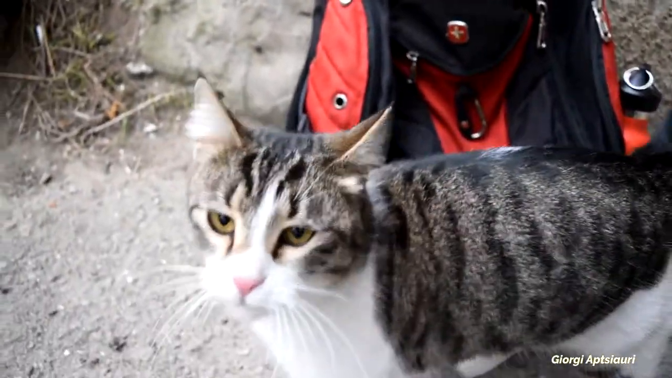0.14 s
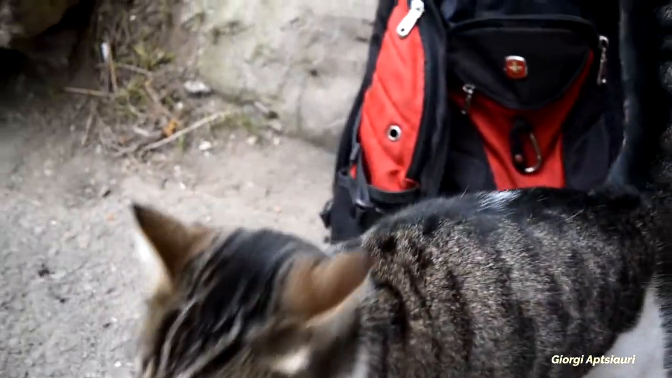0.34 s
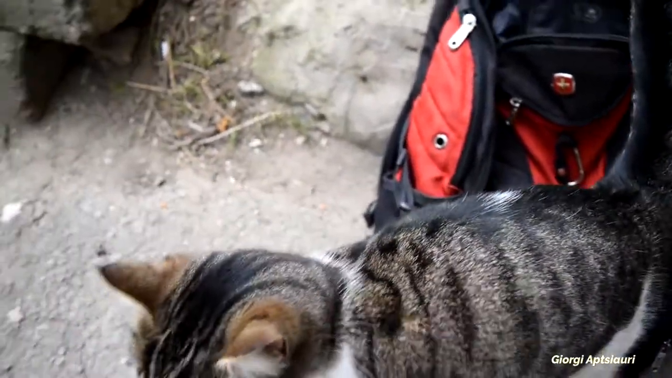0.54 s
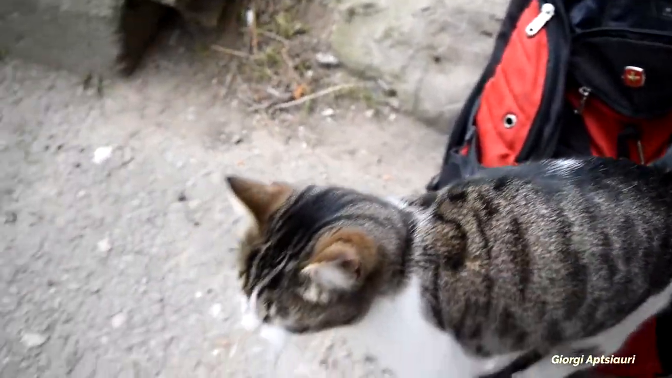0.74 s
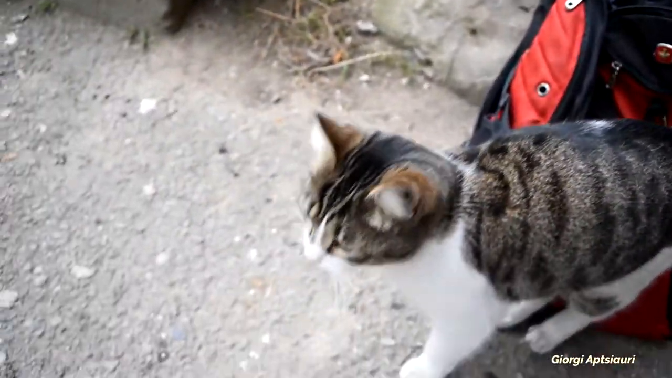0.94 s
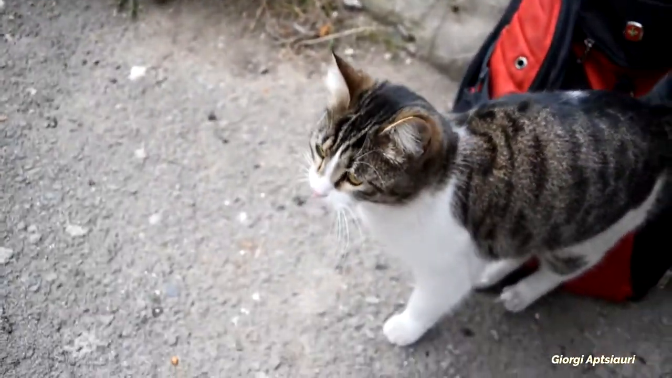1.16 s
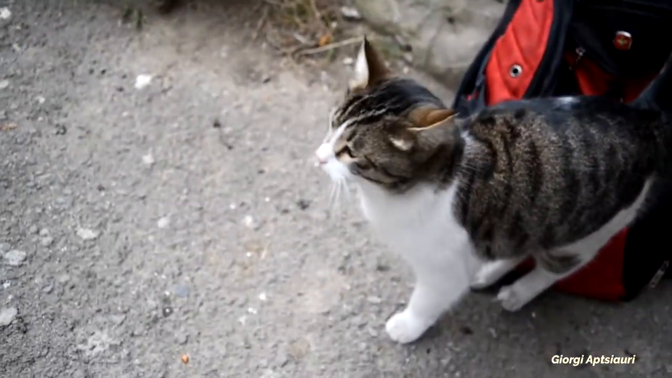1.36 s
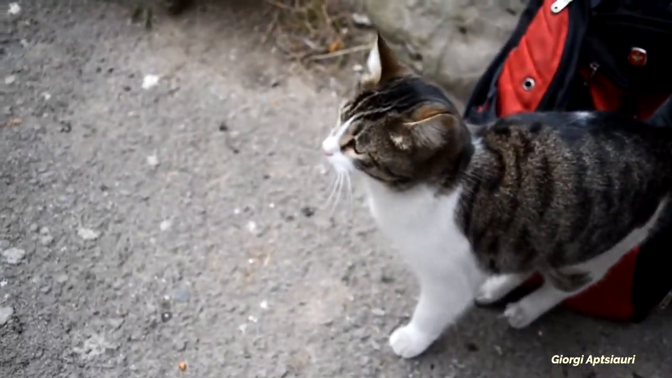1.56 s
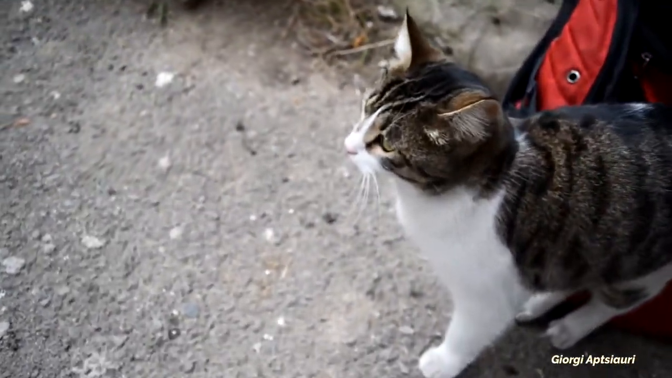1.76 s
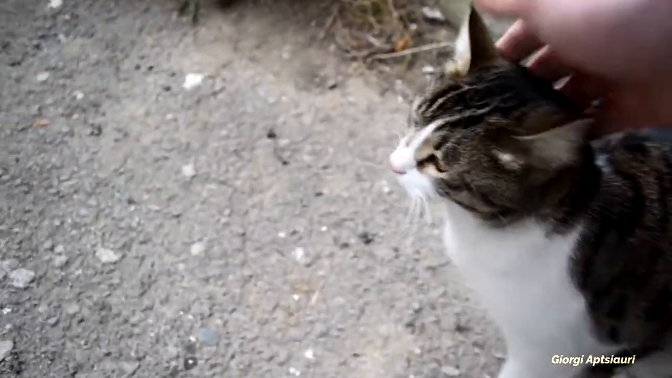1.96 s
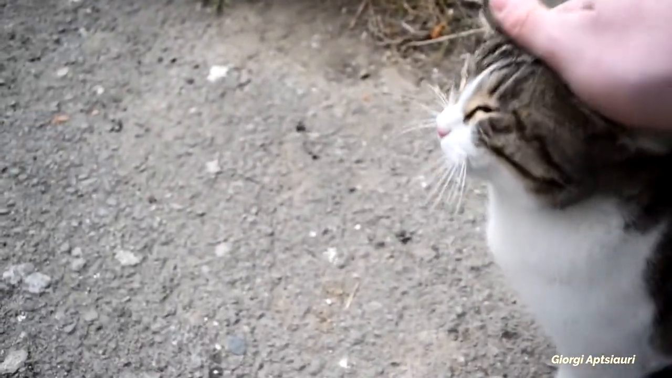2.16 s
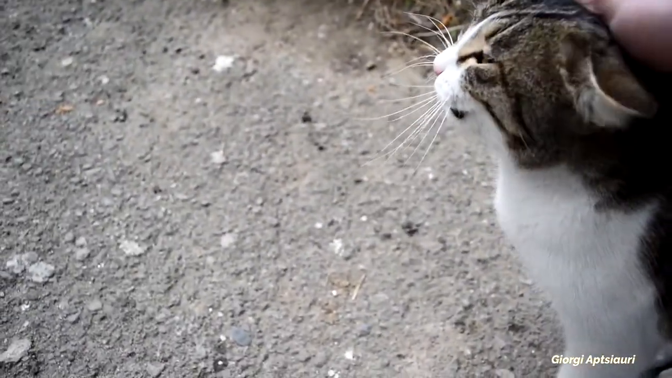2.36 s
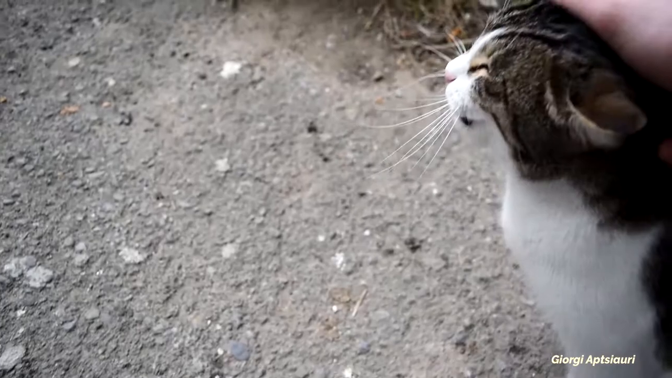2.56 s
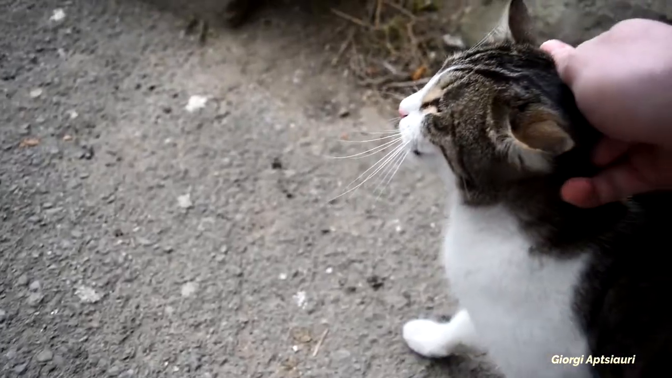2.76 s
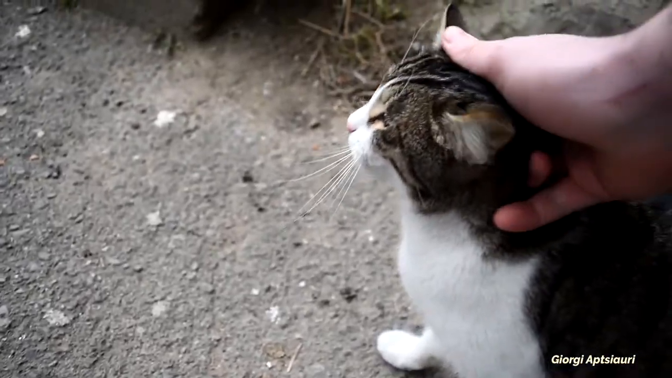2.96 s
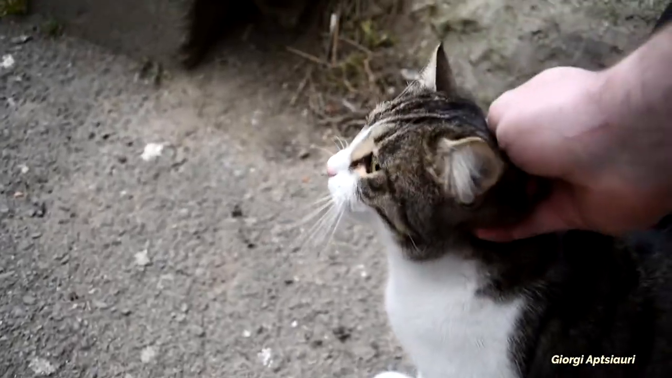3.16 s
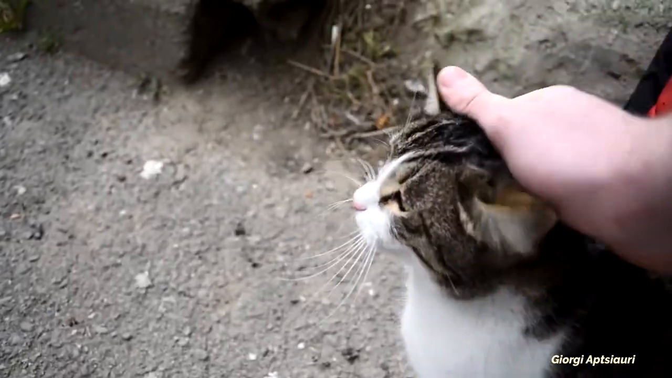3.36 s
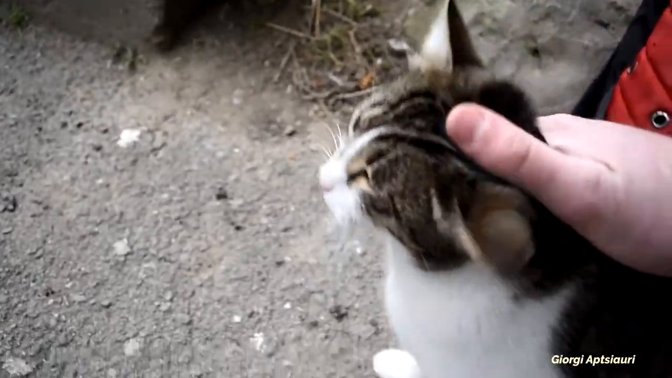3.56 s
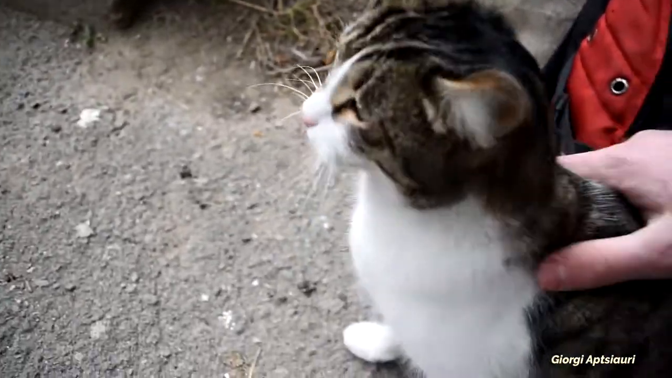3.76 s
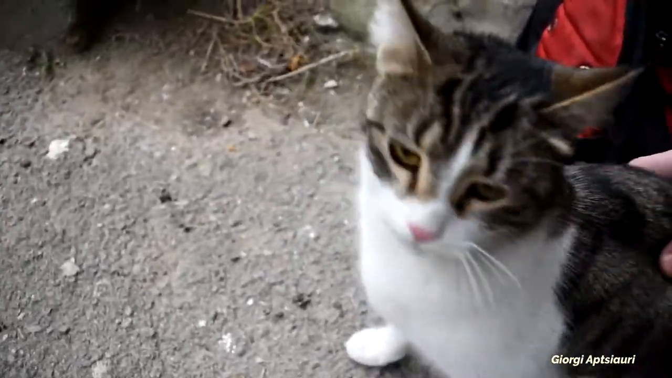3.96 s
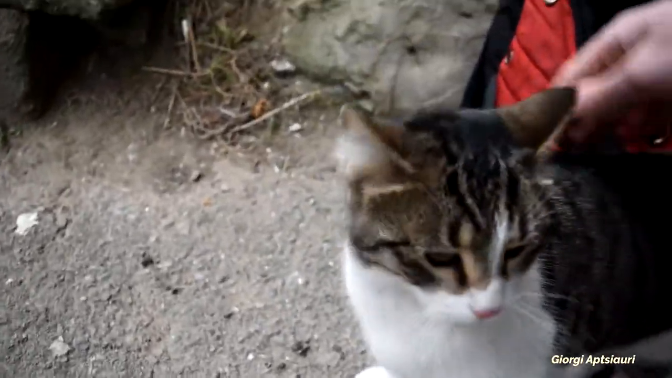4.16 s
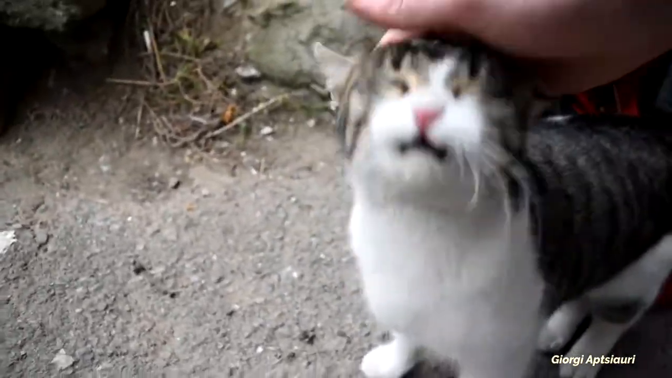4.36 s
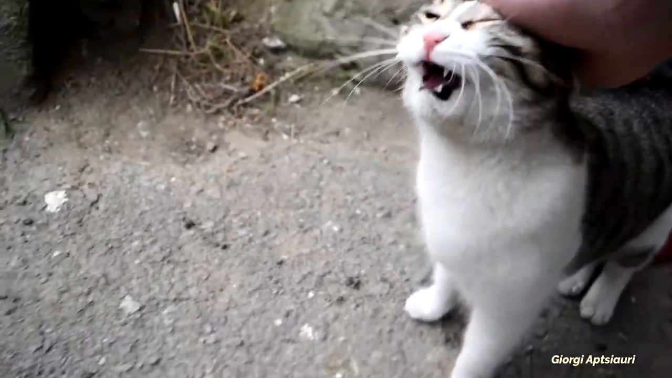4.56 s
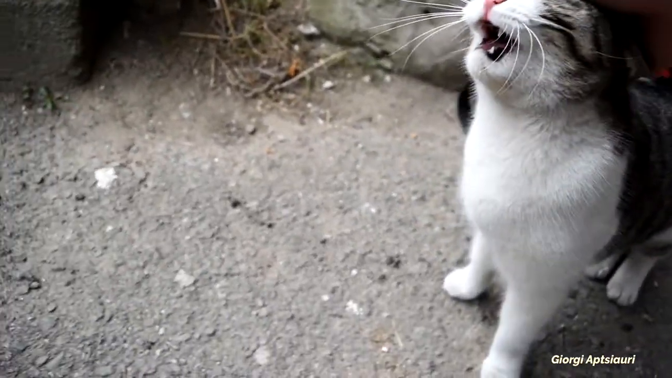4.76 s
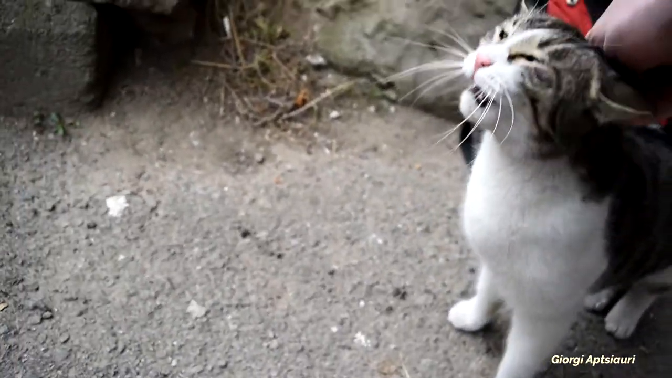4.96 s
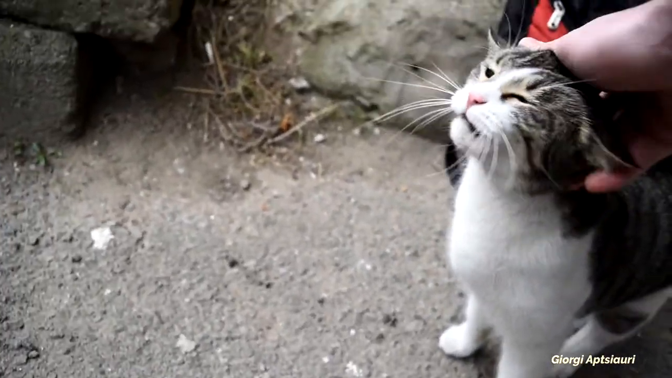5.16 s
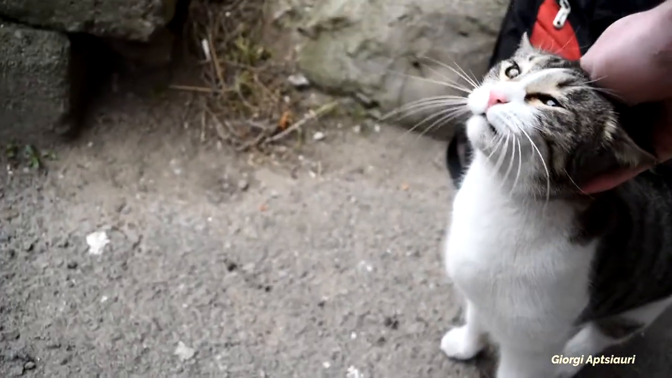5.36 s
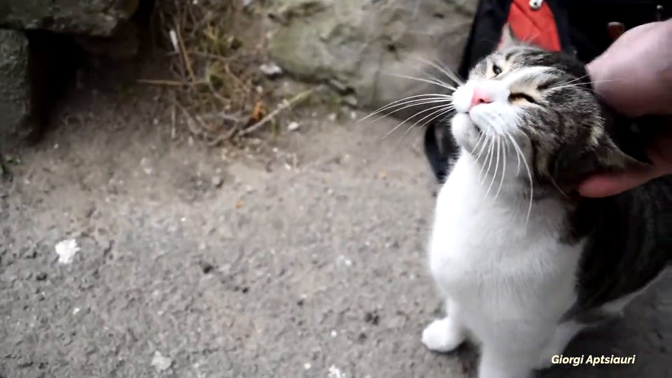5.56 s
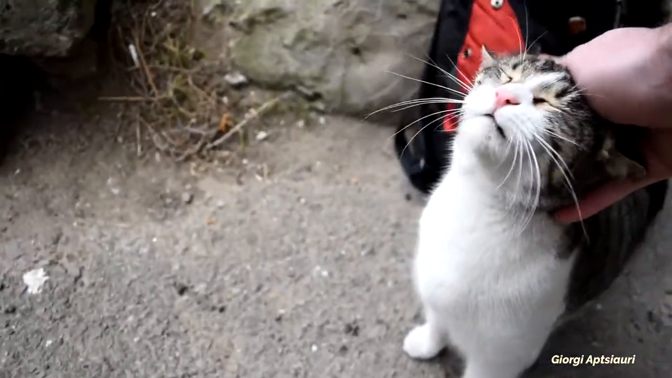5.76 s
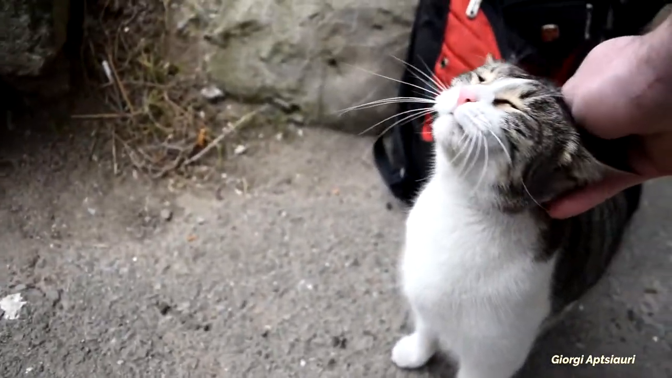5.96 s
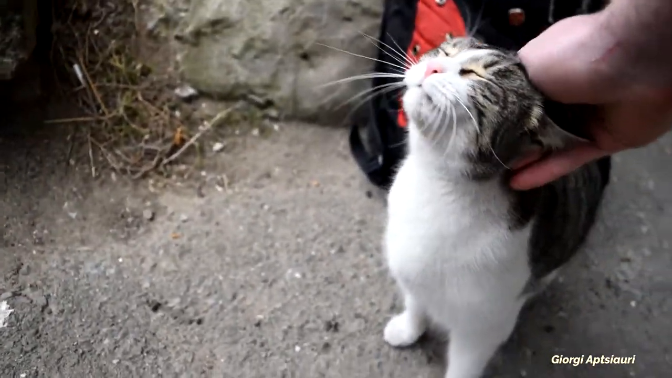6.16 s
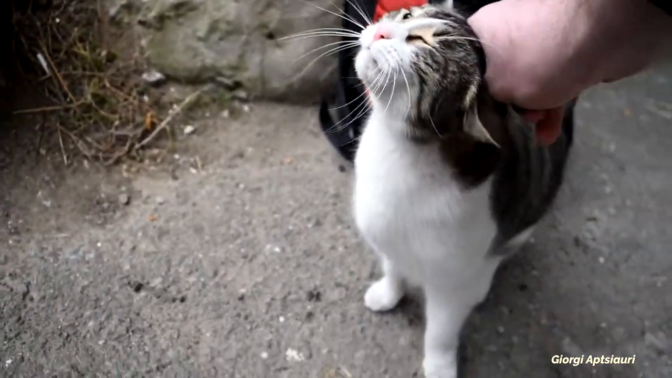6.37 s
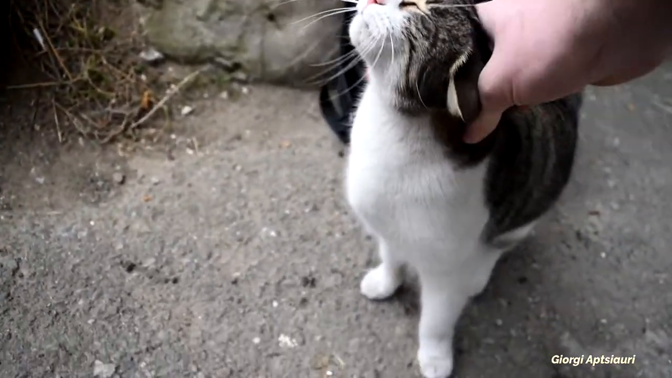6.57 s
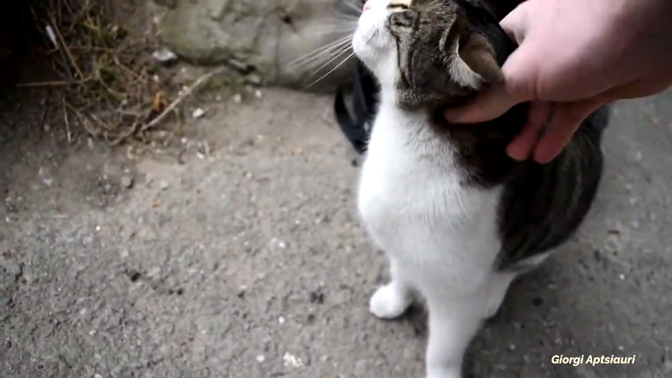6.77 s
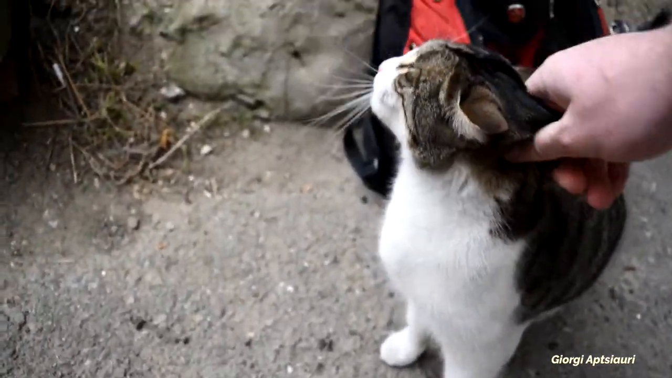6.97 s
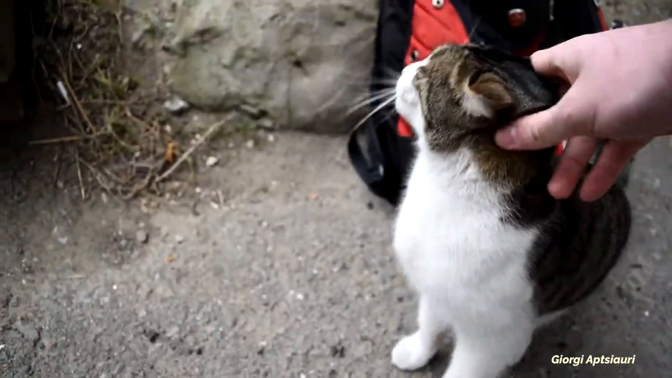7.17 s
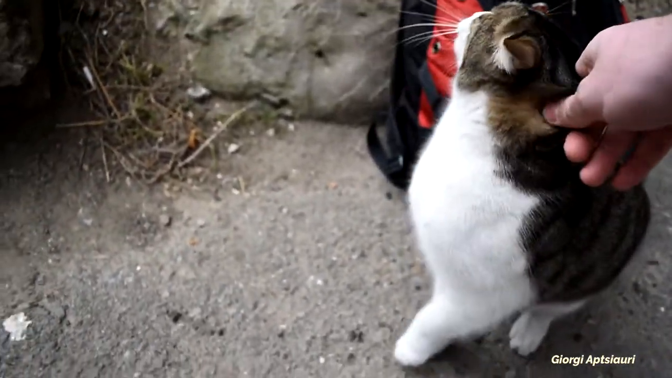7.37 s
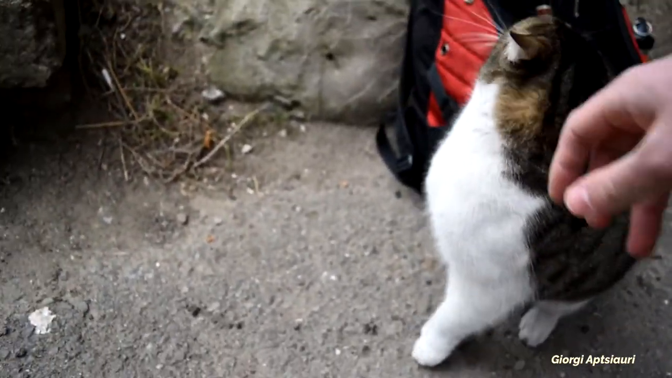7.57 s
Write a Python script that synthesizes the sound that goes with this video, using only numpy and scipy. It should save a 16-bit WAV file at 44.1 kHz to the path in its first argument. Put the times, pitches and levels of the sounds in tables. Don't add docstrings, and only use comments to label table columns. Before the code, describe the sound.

Three hoarse, trilling cat meows on gravelly ground, between clicks, shoe grit and soft fur stroking, with faint traffic and microphone hiss behind.

```python
import sys
import numpy as np
from scipy import signal
from scipy.fft import rfft, irfft, next_fast_len
from scipy.io import wavfile
from scipy.ndimage import map_coordinates

SR = 44100
rng = np.random.default_rng(int(sys.argv[2]) if len(sys.argv) > 2 else 0)


def master_out(mix):
    frames = np.transpose(np.atleast_2d(mix))
    ceiling = np.clip(frames, -1, 1)
    pcm = np.round(ceiling * 32767).astype(np.int16)
    wavfile.write(sys.argv[1], SR, pcm)


def nominal_scale(level):
    x = np.asarray(level, float) / 20
    return 10 ** x


N = 335601

# frequency_hz, level_db (per Hz)
TOWN_SPECTRUM = [(20, -36), (40, -4.5), (65, -4), (130, -5), (250, -8), (400, -11), (1300, -11),
                 (1800, -14), (2500, -19), (3500, -33), (5200, -38), (8000, -31), (12500, -38),
                 (15800, -44)]
# frequency_hz, likeness (-1 to 1)
TOWN_LIKENESS = [(60, .9993), (150, .999), (380, .984), (950, 0.98), (2380, 0.975), (5980, 0.52),
                 (15000, -0.55)]
# frequency_hz, level_db (per Hz)
JACKET_SPECTRUM = [(2000, -1), (2900, 2), (3800, 1.5), (5000, -2), (6500, -3.5), (9000, -5.5),
                   (12000, -14.5), (15600, -16.5)]
# start_s, strongest_s, end_s, level_db
JACKET_MOVES = [(.45, .71, 0.76, -74), (1.05, 1.13, 1.09, -70), (1.4, 1.48, 1.7, -75), (1.5, 2.7, 4, -75),
                (3.6, 3.9, 4.4, -81), (3.44, 3.53, 3.62, -70.5), (4.1, 4.55, 5.1, -72.5),
                (5.2, 5.44, 5.62, -69), (5.65, 5.9, 6.4, -81.5), (6.07, 6.13, 6.5, -77.5),
                (7.4, 7.62, 8.6, -78)]
# frequency_hz, level_db (per Hz)
FUR_SPECTRUM = [(3820, -47), (6500, -1), (7090, -2.5), (7810, 6.5), (8190, 6.5), (10400, 0.5),
                (12600, -11.5), (14000, -35)]
# start_s, strongest_s, end_s, level_db
FUR_STROKES = [(-.02, 0, 0.0035, -57), (.57, .59, 0.62, -66), (.63, .72, 1, -71), (1.08, 1.125, 1.17, -70),
               (1.42, 1.5, 1.24, -77), (2.28, 2.5, 2.85, -67.5), (2.6, 3.05, 3.26, -69),
               (3.47, 3.53, 4.8, -81), (4.12, 4.3, 5.5, -75.5), (4.35, 4.6, 5.5, -75),
               (5.36, 5.5, 5.56, -72), (5.81, 5.9, 5.9, -70), (6.08, 6.15, 6.4, -68),
               (6.22, 6.36, 5.5, -72), (7.45, 7.62, 7.7, -86)]
# time_s, peak_db, ring_hz
KNOCKS = [(.206, -47, 796), (.426, -38, 1450), (.449, -36, 900), (.587, -35.5, 604), (1.366, -37, 1070),
          (1.393, -38.5, 1480), (1.421, -40.5, 1100), (1.5, -33.5, 1040), (1.5262, -22, 2480),
          (1.527, -37.5, 614), (1.533, -32.5, 804), (3.517, -45, 3000), (4.0722, -47, 3030),
          (5.126, -46, 2400), (5.158, -44, 1600), (3.935, -42, 820), (4.072, -43, 1760),
          (5.379, -32.5, 670), (5.395, -40, 890), (6.215, -41.5, 800), (7.599, -30.5, 2300)]

# time_s, pitch_hz
PITCH = [
    [(.27, 552.3), (.365, 632), (.42, 808), (.445, 777), (.49, 836), (.54, 787), (.595, 875), (.66, 795),
     (.82, 753)],
    [(2.2, 639), (2.25, 614), (2.315, 753), (2.345, 769), (2.4, 883), (2.48, 892), (2.525, 798),
     (2.62, 815), (2.74, 803)],
    [(4.47, 488.6), (4.575, 736), (4.64, 834), (4.692, 893), (4.712, 844), (4.765, 837), (4.84, 768),
     (4.93, 780), (5.12, 762)],
]
# time_s, effort_db, opening (0-1)
EFFORT = [
    [(.232, -61, 0.14), (.256, -45.5, 0.12), (.283, -48.5, 0.5), (.33, -39, 0.8), (.375, -49, 0.72),
     (.415, -47.5, 0.89), (.5, -52.5, 0.75), (.6, -45.5, 0.68), (.8, -55.5, 0.8)],
    [(2.16, -58, 0.16), (2.215, -48.5, 0.06), (2.255, -46.5, 0.66), (2.325, -39, 0.83), (2.4, -43.5, 0.5),
     (2.495, -48, 0.5), (2.525, -44, 0.9), (2.76, -48, 0.78), (2.81, -71, 1)],
    [(4.29, -55, 0.13), (4.441, -54.5, 0.05), (4.451, -48, 0.95), (4.52, -36.5, 0.87), (4.57, -39.5, 1),
     (4.66, -37.5, 0.79), (4.8, -39.5, 0.89), (4.87, -44, 0.78), (5.128, -56.5, 0.86)],
]
# palate_db (beside effort), palate_base_hz, palate_closes_s,
# mouth_shift_before_hz, mouth_shift_after_hz, palate_flutter_db
THROAT = [
    (-20, 1850, 0.6, 40, 0, 3.5),
    (-23, 1480, 2.5, -45, -57, 4),
    (-13, 3050, 4.95, 130, 263, 1),
]
# scatter_before (share of pitch), lock_s, slip_s, scatter_after (share of pitch)
HOARSE = [
    (.015, .31, .68, .018),
    (.04, 2.228, 2.745, .028),
    (.06, 4.465, 5.035, .035),
]
# time_s, pitch_drop (share), choke_db (just before)
OPENING_FLAPS = [(0.235, 0.045, 0), (.27, 0.14, -19), (0.2928, .1, -9), (0.3232, 0.18, -5),
                 (2.18, 0.095, -9), (2.22, 0.11, -7), (2.245, 0.12, -5), (2.42, 0.012, -10),
                 (4.464, 0.046, -10), (4.494, 0.041, -4), (4.617, 0.028, 2), (4.652, 0.031, -1)]
# (each time_s, pitch_drop (share), choke_db)
FLAP_BOUTS = [
    (.016, 8, 2, .3, [(4.311, -.12, -10), (4.334, -.12, -14), (4.353, -.13, -14), (4.373, -.02, -14), (4.395, -.12, -14), (4.418, -.02, -16), (4.442, .02, -14)]),
    (.011, 5, 2, .5, [(2.546, 0.04, -8), (2.58, 0.05, -14), (2.61, 0.06, -12), (2.641, .17, -3), (2.677, .16, -3), (2.71, .17, -3), (2.739, .2, -8), (2.77, .11, -3)]),
    (.011, 55, 4, .26, [(4.931, 0.012, -17), (4.956, 0.12, -8), (4.986, .18, -12), (5.014, 0.18, -8), (5.031, .16, -3), (5.046, 0.19, -3), (5.063, 0.19, -3), (5.083, .18, -9), (5.102, .16, -5)]),
]
# opening (0-1), nose_db, jaw_db, mouth_db
MOUTH_OPENING = [(0, 2, -11.5, -39), (.3, -15.5, -1, -7), (.7, -26, 0, -0.5), (1, -32, -15.5, 3.5)]
# frequency_hz, level_db
NOSE = [(300, -12), (450, 6), (950, 4), (1100, -40)]
# frequency_hz, level_db
JAW = [(800, -22.5), (1000, 4), (1150, 3), (1780, 1), (1900, -4.5), (2300, -68)]
# frequency_hz, level_db
MOUTH_SKIRT = [(1200, -33), (2000, -11.5), (2800, -24), (3300, -25), (3800, -29), (4500, -73)]
# overtone (multiple of pitch), level_db
PALATE = [(3, -27), (4, -6.5), (5, -16), (6, -37), (7, -13), (8, -8), (9, -0.5), (10, -9.5), (11, -17),
          (12, -31), (14, -40)]

# time_s, peak_db, ring_hz
TICKS = [(0.4246, -55, 2300), (0.5858, -43, 3590), (0.5862, -34.5, 7540), (1.5262, -26, 10980),
         (0.6044, -55, 3727), (0.8717, -44.5, 3400), (1.4316, -35.5, 5530), (1.4464, -40, 5720),
         (1.4556, -46, 5870), (1.4726, -37, 5600), (1.4854, -35, 5000), (1.4475, -46, 11000),
         (1.5222, -30, 6000), (.443, -48, 6500), (1.119, -42, 3600), (1.501, -29.5, 4300),
         (1.5259, -19, 5630), (1.5316, -26.5, 6000), (3.5169, -41, 8300), (3.7594, -49, 9600),
         (3.9103, -49, 9800), (4.0223, -48, 7800), (4.4314, -32, 4800), (5.0892, -34.5, 3900),
         (5.1103, -47, 3500), (6.4504, -62, 4040), (7.3746, -47, 3310), (7.434, -48, 3200),
         (7.554, -44.5, 3390), (7.5988, -45, 3310), (7.6054, -44, 3330)]
# time_s, peak_db, ring_hz
CRUNCHES = [(.449, -40, 600), (.611, -44, 850), (.63, -46, 1650), (.672, -36, 820), (.684, -35, 1550),
            (.695, -40, 980), (.705, -44, 1500), (.718, -38, 1800), (.732, -45, 560), (.742, -43, 1400),
            (.76, -46, 1600), (.78, -41, 1700), (.803, -37, 1700), (.812, -54, 2700), (.829, -37, 1760),
            (.835, -37, 900), (.838, -40, 1750), (.845, -43.5, 285), (.861, -41, 1600), (1.011, -45, 930),
            (1.3928, -35.5, 1470), (5.086, -35, 710), (5.11, -38, 775), (5.064, -40, 752)]
# frequency_hz, level_db (per Hz)
GRIT_SPECTRUM = [(150, -16), (380, -25), (520, 0.5), (700, -3), (1270, -8.5), (1700, 0), (2400, -11.5),
                 (2880, -15), (3700, -12), (4400, -30), (4950, -17), (5600, -27), (7500, -20), (12000, -50)]
# start_s, strongest_s, end_s, level_db
SCUFFS = [
    (.48, .56, 0.68, -56.5),
    (.6, .71, 0.79, -52.5),
    (.62, .76, 0.98, -51.5),
    (1.84, 1.95, 2.11, -60.5),
    (3.35, 3.95, 4.02, -65.5),
    (4.3, 4.44, 4.55, -60.5),
    (5.27, 5.4, 5.68, -61),
    (6.1, 6.24, 5.4, -69),
]
# time_s, length_s, level_db, ring_hz
CRINKLES = [(1.041, 0.027, -60, 5000), (1.122, 0.024, -59, 5770), (1.262, 0.06, -65.5, 5340),
            (1.477, 0.023, -47, 4900), (1.509, 0.018, -53, 5000), (1.5263, 0.0028, -30.5, 5800),
            (1.474, .008, -58, 9000), (1.528, .003, -38, 5500), (5.034, 0.0088, -53, 7010),
            (5.066, 0.012, -51, 6760), (2.078, 0.089, -62, 5040), (3.521, 0.026, -65, 7950),
            (6.156, 0.043, -64, 5230)]
# time_s, level_db
WHINE = [
    (3.47, -84),
    (3.55, -74),
    (3.85, -75),
    (4.0, -84),
]
# start_s, strongest_s, end_s, level_db
LORRY_SWELLS = [
    (4.75, 4.9, 5.05, -70),
    (5.95, 6.15, 6.4, -61),
    (6.5, 6.78, 7, -62),
]
# frequency_hz, level_db (per Hz)
LORRY_SPECTRUM = [(45, -40), (58, 5), (64, 5), (72, -3), (90, -46.5)]
# time_s, peak_db, pitch_hz
BIRD_PIPS = [
    (6.282, -52, 2260),
    (6.4527, -48.5, 2240),
    (6.652, -51, 2240),
]
# time_s, level_db
SLEEVE_DRAG = [
    (6.75, -68),
    (6.95, -62.5),
    (7.1, -54),
    (7.2, -48),
    (7.27, -43),
    (7.31, -46),
    (7.345, -56),
    (7.38, -70),
]
# frequency_hz, level_db (per Hz)
SLEEVE_SPECTRUM = [(60, -37), (100, -5), (250, -6), (530, -7), (1730, -8.5), (2100, -13), (2700, -5.5),
                   (3480, -14), (4120, -9.5), (9200, -18), (10600, -25), (12000, -19), (13600, -35),
                   (15700, -33)]
# centre_hz, width_hz, level_db
CASE = [(4160, 130, -3), (5740, 170, -4), (6970, 160, -8), (15200, 500, -4)]


def unit(x):
    return x / np.sqrt(np.mean(x ** 2) + 1e-20)


def along(points, hz):
    f, v = np.transpose(points)
    return np.interp(np.log(hz + 1), np.log(f + 1), v)


def curves(rows):
    s, *cols = np.transpose(rows)
    return [np.interp(np.arange(N) / SR, s, c) for c in cols]


def step(t, s, width):
    return .5 + .5 * np.tanh((t - s) / width)


def fade(rows, s):
    t = np.arange(N) / SR
    return np.clip(np.minimum(t - rows[0][0], rows[-1][0] - t) / s, 0, 1)


def swells(moves, pointed):
    t, strength = np.arange(N) / SR, np.zeros(N)
    for start, top, end, db in moves:
        u = np.interp(t, [start, top, end], [0, 1, 0])
        strength += nominal_scale(db) * np.abs(np.sin(np.pi / 2 * u)) ** pointed
    return strength


def wobble(rate, size=N):
    points = rng.standard_normal(int(size * rate / SR) + 4)
    return map_coordinates(points, [np.arange(size) * rate / SR])


def coloured(x, gain):
    m = next_fast_len(N)
    return irfft(rfft(x, m) * gain(np.fft.rfftfreq(m, 1 / SR)), m)[..., :N]


def rush(spectrum, alike, grain_db, grain_rate):
    def middle_and_side_gain(hz):
        turn = np.arccos(np.clip(along(alike, hz), -1, 1)) / 2
        return nominal_scale(along(spectrum, hz)) * [np.cos(turn), np.sin(turn)]

    pair = rng.standard_normal((2, N)) * nominal_scale(grain_db * wobble(grain_rate))
    mid, side = coloured(pair, middle_and_side_gain)
    return unit(np.array([mid + side, mid - side]))


def ring(x, hz, spread):
    band = [hz / spread, min(hz * spread, SR / 2.2)]
    return signal.lfilter(*signal.butter(2, band, "band", fs=SR), x)


def contacts(events, t60, spread, side):
    out, t = np.zeros((2, N + SR)), np.arange(SR // 40) / SR
    for s, db, hz in events:
        crack = rng.standard_normal((2, len(t))) * nominal_scale(-60 * t / t60)
        mid, apart = ring(crack, hz, spread)
        hit = np.array([np.roll(mid, 1) + side * apart, mid - side * apart])
        out[:, round(s * SR):][:, :len(t)] += nominal_scale(db) * hit / np.abs(mid).max()
    return out[:, :N]


def town():
    level_db = -55.4 + .3 * wobble(1.3)
    return nominal_scale(level_db) * rush(TOWN_SPECTRUM, TOWN_LIKENESS, grain_db=.3, grain_rate=6)


def jacket():
    moving = nominal_scale(-72) + swells(JACKET_MOVES, pointed=0.78)
    alike = [(2000, 0.96), (5000, 0.75), (12000, 0.27)]
    return moving * nominal_scale(6.0) * rush(JACKET_SPECTRUM, alike, grain_db=1.0, grain_rate=610)


def fur():
    stroking = swells(FUR_STROKES, pointed=1.0)
    alike = [(7000, 1.0), (13000, 0.47)]
    return stroking * nominal_scale(5) * rush(FUR_SPECTRUM, alike, grain_db=1.0, grain_rate=180)


def knocks():
    return contacts(KNOCKS, t60=.011, spread=1.8, side=.08)


def trill():
    t, slack, gain_db = np.arange(N) / SR, np.zeros(N), np.zeros(N)
    opening_bout = (.008, -43, 2, .26, OPENING_FLAPS)
    for length, db_per_drop, square, width, flaps in [opening_bout] + FLAP_BOUTS:
        for s, drop, choke_db in flaps:
            u = (t - s) / length
            shape = np.where(u < 0, u / .45, u)
            bump = drop * np.exp(-np.abs(shape) ** square)
            slack = np.where(abs(bump) > abs(slack), bump, slack)
            choke = np.exp(-((u + 0.58) / width) ** 2)
            gain_db += db_per_drop * bump + choke_db * choke
    return 1 - slack, gain_db


def meow(pitch, rows, throat, hoarse, slack, flap_db):
    bright_db, base_hz, shut_s, shift_hz, shut_hz, flutter_db = throat
    before, lock_s, slip_s, after = hoarse
    span = slice(int(rows[0][0] * SR), int(rows[-1][0] * SR))
    t = np.arange(N)[span] / SR
    size = len(t)
    aim = curves(pitch)[0][span]
    effort_db, opening = (c[span] for c in curves(rows))
    breath = (nominal_scale(flap_db) * fade(rows, 0.012))[span]

    lock_width_s = .015
    scatter = .004 + before * step(-t, -lock_s, lock_width_s) + after * step(t, slip_s, lock_width_s)
    folds_hz = aim * slack[span] * (1 + 0.00896 * wobble(55, size) + scatter * wobble(400, size))
    phase = 2 * np.pi * np.cumsum(folds_hz) / SR

    wide, *shares_db = np.transpose(MOUTH_OPENING)
    nose_db, jaw_db, mouth_db = (effort_db + np.interp(opening, wide, c) for c in shares_db)
    palate_width_s = 0.021
    closing = step(t, shut_s, palate_width_s)
    shut = closing + step(-t, -lock_s, palate_width_s)
    palate_db = effort_db + bright_db + flutter_db * wobble(45.3, size) + 1.5 * opening - 10.5 * shut
    mouth_hz = 1640 + shift_hz + (shut_hz - shift_hz) * closing + 0.77 * aim
    lift = 5.91 + base_hz / aim - 9

    puffs = unit(ring(rng.standard_normal(size) * (1 + np.cos(phase)), 2300, spread=1.5))
    voice = nominal_scale(20.5 + mouth_db) * scatter * puffs * breath
    for k in range(1, 15):
        hz = k * folds_hz
        mouth = 1 / (1 + ((hz - mouth_hz) / 280) ** 4) + nominal_scale(along(MOUTH_SKIRT, hz))
        tract = nominal_scale(mouth_db) * mouth
        tract += nominal_scale(along(NOSE, hz) + nose_db)
        tract += nominal_scale(along(JAW, hz) + jaw_db)
        tract += nominal_scale(along(PALATE, k - lift * (k > 5)) + palate_db)
        shimmer = nominal_scale((1.0 + 0.045 * k + 28 * scatter) * wobble(70, size))
        voice += tract * shimmer * np.sin(k * phase + k * k * 0.403) * breath
    return span, voice


def cat():
    slack, flap_db = trill()
    voice = np.zeros(N)
    for call in zip(PITCH, EFFORT, THROAT, HOARSE):
        span, sound = meow(*call, slack, flap_db)
        voice[span] += sound
    return np.array([voice, 0.47 * voice + 0.47 * np.roll(voice, 1)]) * nominal_scale([[-.2], [.2]])


def ticks():
    return contacts(TICKS, t60=.009, spread=1.5, side=.35)


def crunches():
    return contacts(CRUNCHES, t60=.022, spread=1.25, side=.08)


def shoes():
    alike = [(300, .995), (4000, .96)]
    grit = rush(GRIT_SPECTRUM, alike, grain_db=2.6, grain_rate=300)
    return swells(SCUFFS, pointed=1.3) * nominal_scale(5) * grit


def crinkle():
    out = np.zeros((2, N))
    t = np.arange(-SR // 5, SR // 5) / SR
    for s, length, db, hz in CRINKLES:
        grains = rng.standard_normal((2, len(t))) * nominal_scale(3.5 * wobble(364.5, len(t)))
        grains[1] = 0.5 * grains[0] + 0.9 * grains[1]
        snap = unit(ring(grains, hz, spread=1.18)) * np.exp(-(t / length) ** 2)
        out[:, round(s * SR) - SR // 5:][:, :len(t)] += nominal_scale(db) * snap
    return out


def whine():
    pitch_hz = 1910 * (1 + .004 * wobble(25))
    phase = 2 * np.pi * np.cumsum(pitch_hz) / SR
    return nominal_scale(curves(WHINE)[0] + 3 * wobble(30)) * fade(WHINE, .02) * np.sin(phase)


def lorry():
    drone = rush(LORRY_SPECTRUM, [(60, .9993)], grain_db=.3, grain_rate=6)
    return swells(LORRY_SWELLS, pointed=1.2) * drone


def bird():
    return contacts(BIRD_PIPS, t60=.05, spread=1.05, side=.1)


def sleeve():
    dragging = nominal_scale(curves(SLEEVE_DRAG)[0]) * fade(SLEEVE_DRAG, 0.02)
    alike = [(1400, .998), (3100, 0.96), (15000, 0.71)]
    return dragging * rush(SLEEVE_SPECTRUM, alike, grain_db=0.5, grain_rate=120)


def scene():
    background = town() + whine() + lorry() + bird()
    cloth_and_fur = jacket() + fur() + crinkle() + sleeve()
    ground_and_bag = knocks() + ticks() + crunches() + shoes()
    return background + cloth_and_fur + ground_and_bag + cat()


def band_limit(x):
    return signal.sosfilt(signal.butter(12, 17000, fs=SR, output="sos"), x)


def record(dry):
    def case_gain(hz):
        ringing = sum(nominal_scale(db) / (1 + ((hz - centre) / width) ** 2) for centre, width, db in CASE)
        return (1 + ringing) * (hz < 15750)

    return band_limit(coloured(dry, case_gain))


dry = scene()
out = record(dry)
master_out(out)
```